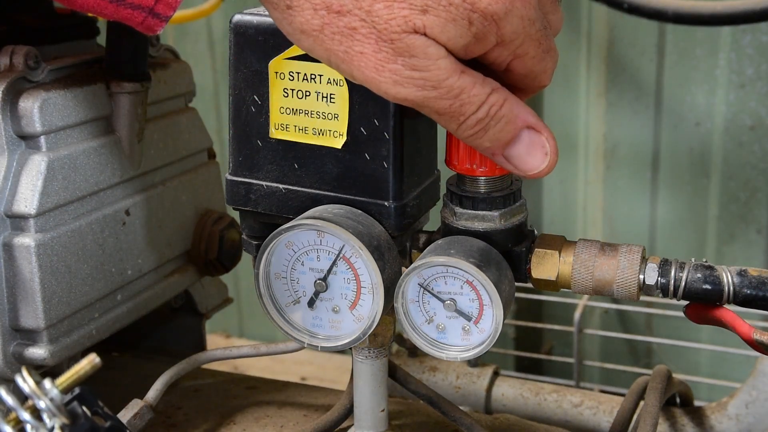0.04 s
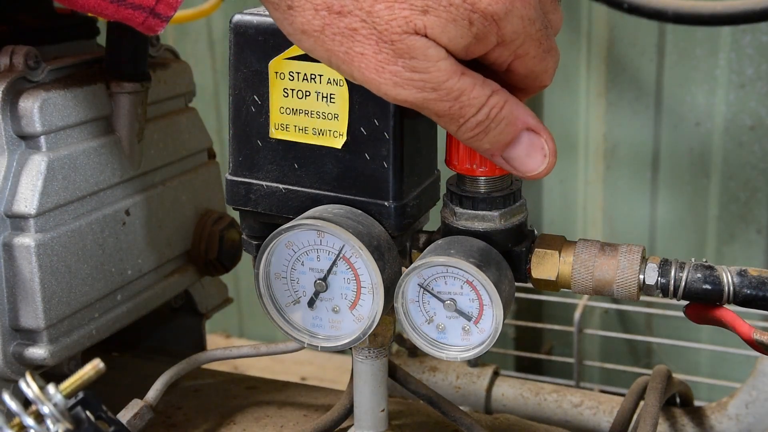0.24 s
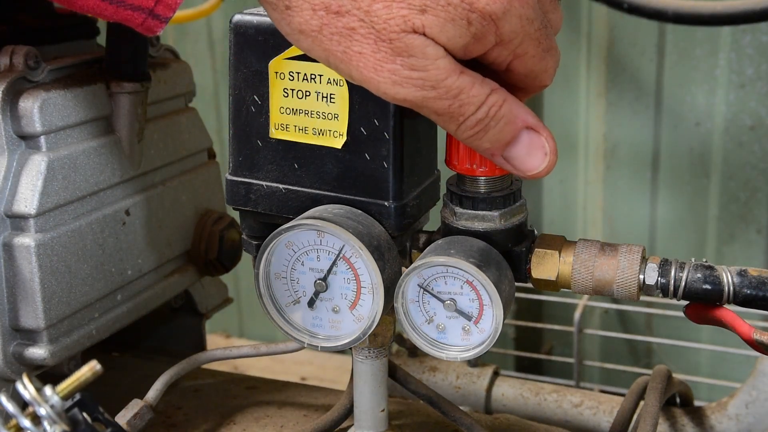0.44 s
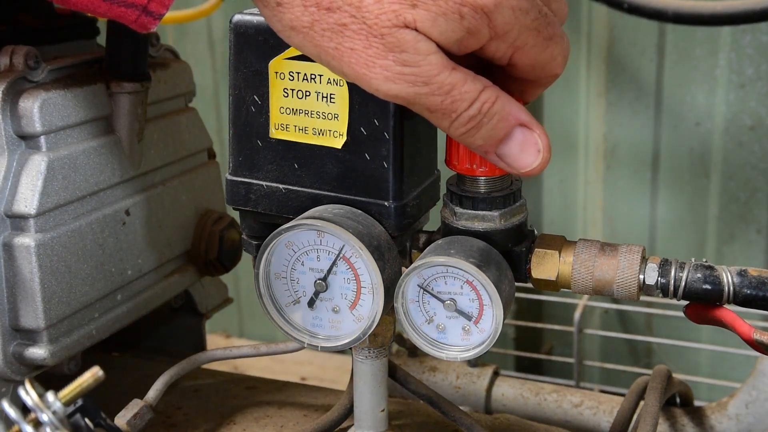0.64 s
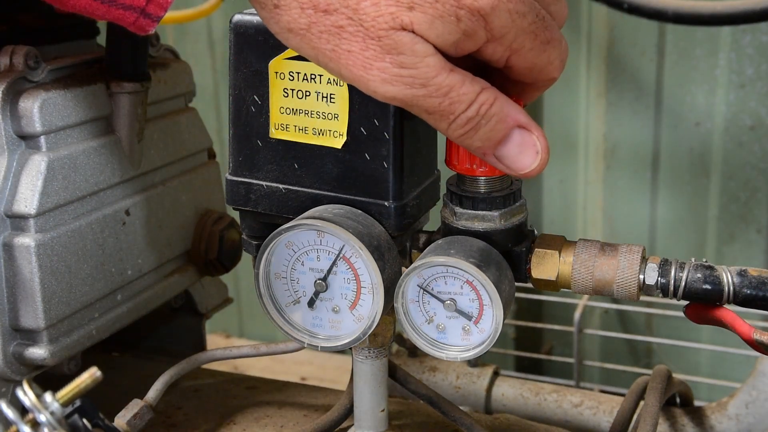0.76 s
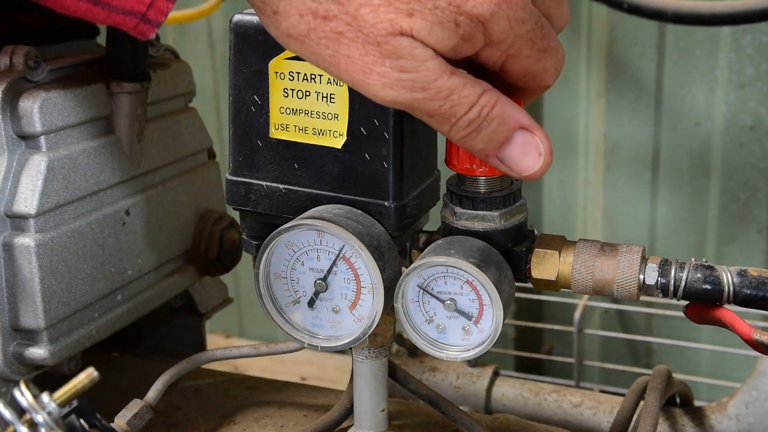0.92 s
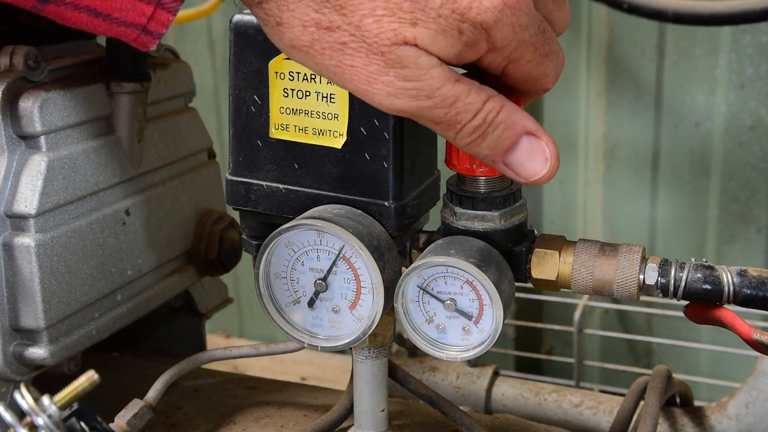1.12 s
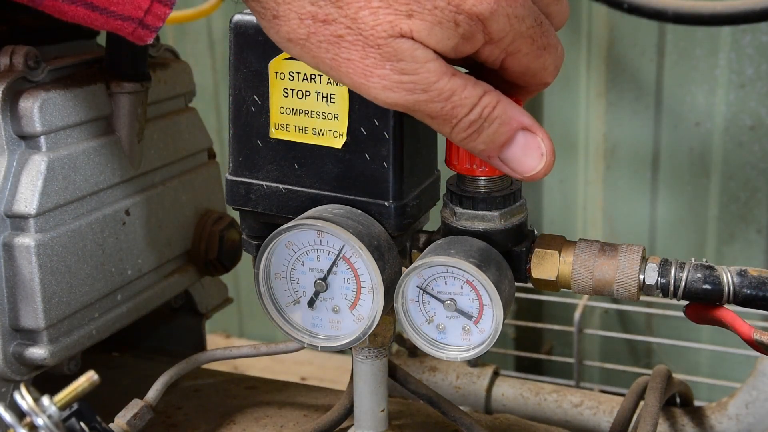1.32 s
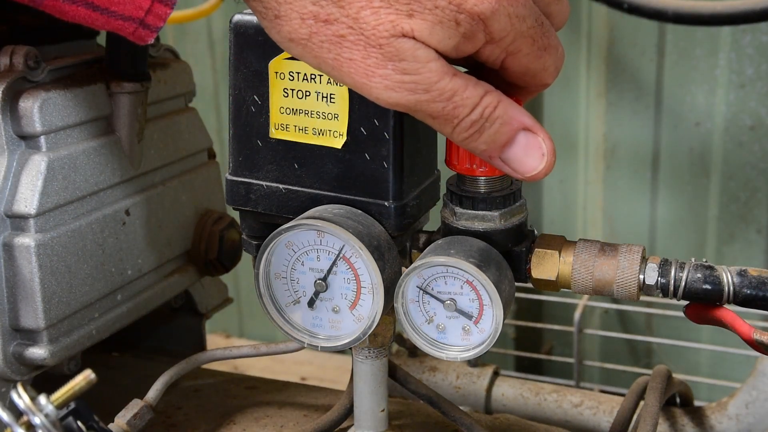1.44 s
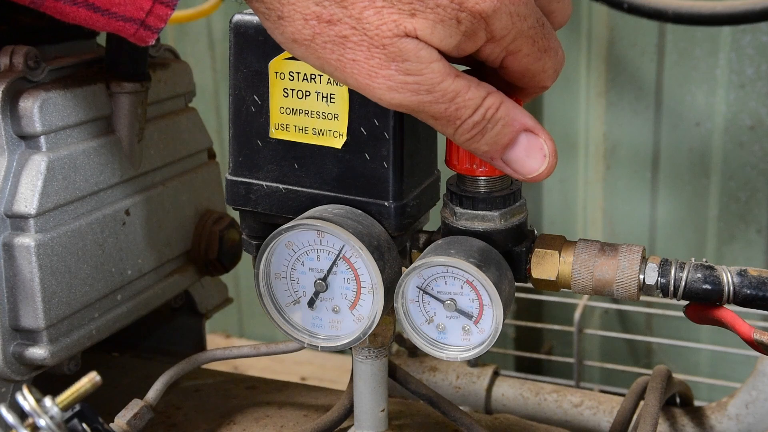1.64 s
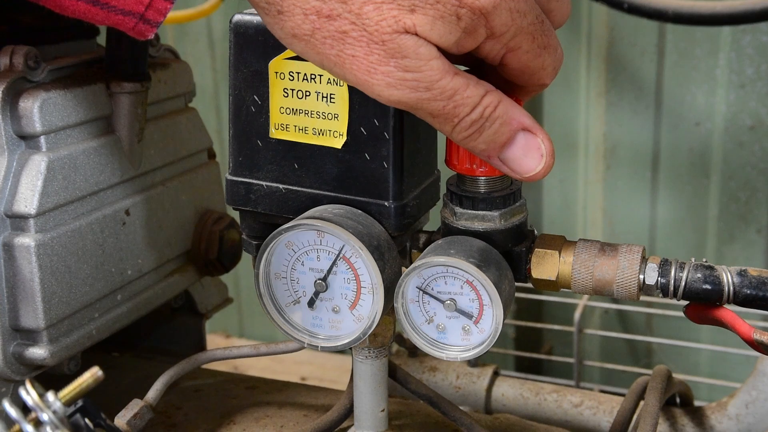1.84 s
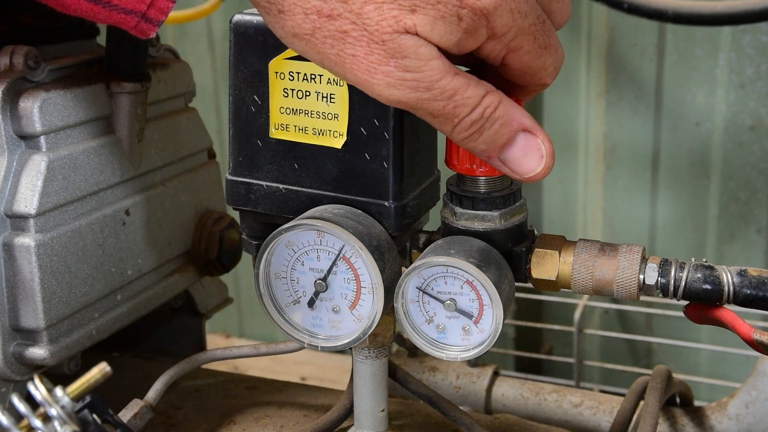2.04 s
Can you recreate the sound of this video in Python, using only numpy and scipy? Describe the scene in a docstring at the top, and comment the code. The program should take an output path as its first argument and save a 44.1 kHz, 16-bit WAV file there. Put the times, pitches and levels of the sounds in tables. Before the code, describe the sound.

Steady bright hiss of escaping compressed air, faint low rumble beneath, slight hand handling near the end

```python
"""Compressed air bleeding through a valve

Air hisses steadily through a regulator valve and hose in a workshop: patchy noise for the jet, with more
noise shaped by the resonances of the valve throat, the hose and the small outlet cavities.
Underneath, a lumpy low rumble made of filtered noise comes and goes. A hand knocks the knob once
(a few decaying sines) and rubs it (short strokes of grainy noise)."""
import sys
import numpy as np
from scipy import signal
from scipy.fft import rfft, irfft, next_fast_len
from scipy.io import wavfile
from scipy.ndimage import uniform_filter1d, map_coordinates

SR = 44100
rng = np.random.default_rng(int(sys.argv[2]) if len(sys.argv) > 2 else 0)


def log_audio(samples):
    """Write samples as a 16-bit WAV file to the path given in sys.argv[1]."""
    # one column per channel
    frames = np.atleast_2d(samples).T
    # limit to full scale, then quantise
    limited = np.clip(frames, -1, 1)
    pcm = np.round(limited * 32767).astype(np.int16)
    wavfile.write(sys.argv[1], SR, pcm)


N = 91595  # length in samples, about 2.08 s


def amp(db):
    """Turn dB into gain."""
    return 10 ** (np.asarray(db) / 20)


def unit(x):
    """Scale to rms 1."""
    return x / np.sqrt(np.mean(x ** 2) + 1e-20)


def along(points, hz):
    """Read an EQ curve of (f, level) points, straight in dB over log frequency."""
    f, level = np.transpose(points)
    return np.interp(np.log(hz + 1), np.log(f + 1), level)


def curve(rows):
    """Draw an automation line through (t, level) rows, one value per sample."""
    t, level = np.transpose(rows)
    return np.interp(np.arange(N) / SR, t, level)


def wobble(rate):
    """Smooth random curve through `rate` random knots a second."""
    knots = rng.standard_normal(int(N * rate / SR) + 4)
    return map_coordinates(knots, [np.arange(N) * rate / SR])


def filtered(x, response):
    """Multiply the spectrum of x by a function of frequency in Hz."""
    size = next_fast_len(N + SR // 2)  # spare room so tails do not wrap round
    spectrum = rfft(x, size) * response(np.fft.rfftfreq(size, 1 / SR))
    return irfft(spectrum, size)[..., :N]


def turbulence(patchy_db):
    """Turbulent noise of unit power per Hz, its gain varying in random time-frequency patches."""
    cells = signal.stft(rng.standard_normal(N + 512), nperseg=256)[2]
    field = rng.standard_normal(cells.shape)
    field = uniform_filter1d(field, size=4, axis=0)  # blur across frequency
    field = uniform_filter1d(field, size=6, axis=1)  # blur across time
    noise = signal.istft(cells * amp(patchy_db * unit(field)), nperseg=256)[1][:N]
    return unit(noise) * np.sqrt(SR / 2)


def ringing(modes, patchy_db):
    """Turbulence coloured by air resonances whose powers add."""
    def response(f):
        power = 0
        for hz, width, db in modes:
            power = power + amp(2 * db) / (1 + (2 * (f - hz) / width) ** 2) ** 2
        return np.sqrt(power)
    return filtered(turbulence(patchy_db), response)


# rise and fall of the rumble before the bass cut: t/s, level/dB
RUMBLE_LEVEL = [(0, -55), (.17, -47), (.35, -53), (.5, -45), (.8, -50), (.95, -68), (1.6, -59), (1.85, -49),
                (2.08, -56)]
# EQ of the rumble, before levelling: f/Hz, level/dB
RUMBLE_EQ = [(20, -30), (40, -1), (60, 4.5), (90, -3.5), (160, -25), (300, -66)]


def rumble():
    """Low-passed noise, narrow enough in band to sound lumpy, riding a level curve."""
    noise = filtered(rng.standard_normal(N), lambda f: amp(along(RUMBLE_EQ, f)))
    return amp(curve(RUMBLE_LEVEL)) * unit(noise)


# modes of the struck knob, relative to the knock level: f/Hz, level/dB, 60 dB decay time/s
KNOB_MODES = [(380, -3, .02), (580, -2, .015), (850, -2, .01), (1100, -5, .01), (1370, -5, .03)]
KNOCK_S, KNOCK_DB, KNOCK_THIN_HZ = 1.7117, -27, 120  # start, level, low-cut corner


def knock():
    """One dull knock: the knob's modes start together and die away exponentially."""
    since = np.maximum(np.arange(N) / SR - KNOCK_S, 0)
    body = np.zeros(N)
    for hz, db, t60 in KNOB_MODES:
        body -= amp(db - 60 * since / t60) * np.sin(2 * np.pi * hz * since)
    return filtered(amp(KNOCK_DB) * body, lambda f: 1j * f / (KNOCK_THIN_HZ + 1j * f))


# strokes of the hand: start t/s, length/s, peak level/dB of the stroke's envelope
RUB_STROKES = [(.2, .22, -47), (1.74, .1, -48), (1.84, .14, -42)]
# EQ of the rubbing, before levelling: f/Hz, level/dB
RUB_EQ = [(100, -22), (200, -4.5), (320, 5), (600, -5), (1400, -2.5), (2000, -14), (3500, -31)]


def rubbing():
    """Skin on the knob: noise with a fast random gain for grain, under rounded strokes."""
    t = np.arange(N) / SR
    stroke = np.zeros(N)
    for start, length, db in RUB_STROKES:
        progress = np.clip((t - start) / length, 0, 1)
        stroke += amp(db) * np.sin(np.pi * progress) ** .6
    grain = rng.standard_normal(N) * amp(3.2 * wobble(110))
    return stroke * unit(filtered(grain, lambda f: amp(along(RUB_EQ, f))))


# broad spectrum of the jet, before the flow gain: f/Hz, level/dB per Hz
JET_EQ = [(30, -79), (100, -76.5), (600, -77.5), (1300.0, -81), (2600.0, -75.5), (3700.0, -80),
          (5200.0, -79.5), (6500.0, -71), (8500.0, -72), (9500.0, -67.5), (11000.0, -70), (13000.0, -56),
          (15700.0, -62)]


def jet():
    """Broad turbulence of the escaping air."""
    return filtered(turbulence(patchy_db=1.38), lambda f: amp(along(JET_EQ, f)))


# air column of the hose, before flicker and flow: f/Hz, -6 dB width/Hz, peak level/dB per Hz
HOSE_MODES = [(315, 130, -77.5), (541, 130, -77.5), (935, 130, -72), (1370, 160, -80), (1860, 100, -75.5),
              (2070, 80, -74), (2910, 360, -73), (3310, 150, -72.5), (4250, 100, -74), (4890, 120, -78.5),
              (5770, 160, -77.5)]


def hose():
    """Turbulence through the hose's air column, flickering slowly."""
    return amp(1.6 * wobble(9)) * ringing(HOSE_MODES, patchy_db=1.2)


# valve throat, odd modes of a short tube, before flicker and flow:
# f/Hz, -6 dB width/Hz, peak level/dB per Hz
THROAT_MODES = [(2200, 70, -68), (2385, 140, -59.5), (2500, 80, -64), (2600, 80, -65), (6750, 100, -68),
                (6980, 160, -61.5), (7175, 240, -58), (7180, 70, -58), (7490, 280, -66)]


def throat():
    """Turbulence through the throat's short tube, flickering fast."""
    return amp(-0.12 + .7 * wobble(45)) * ringing(THROAT_MODES, patchy_db=0.54)


# small outlet cavities, before flicker and flow: f/Hz, -6 dB width/Hz, peak level/dB per Hz
OUTLET_MODES = [(9700, 460, -61.5), (10170, 240, -56), (10540, 290, -56.5), (11370, 750, -52.5),
                (11520, 360, -52.5), (11970, 750, -53), (12280, 140, -49.5), (12740, 200, -53.5),
                (13010, 270, -52.5), (13180, 100, -49), (13310, 130, -52), (13540, 90, -53.5),
                (14240, 200, -52), (14450, 210, -50.5), (14665, 50, -50), (14710, 240, -47),
                (15080, 290, -52.5), (15700, 120, -59)]


def outlet():
    """Turbulence through the outlet's small cavities, a bright band with a slight fast flicker."""
    return amp(-0.12 + .3 * wobble(50.2)) * ringing(OUTLET_MODES, patchy_db=1.47)


# slow drift of the flow, applied to all the air: t/s, level/dB
FLOW_LEVEL = [(0, 0.6), (.5, -0.5), (1.1, 0.27), (1.6, 0.5), (2.08, 0.3)]


def air():
    """The jet and the cavities it excites swell together with the flow."""
    flow_db = curve(FLOW_LEVEL) + .25 * wobble(9.19) + .3 * wobble(70.03)
    return amp(flow_db) * (jet() + hose() + throat() + outlet())


def scene():
    """Mix all sources to one channel."""
    return (rumble() + knock() + rubbing() + air())[None]


BASS_CUT_HZ, TOP_HZ, EDGE_HZ = 45, 15740, 12  # low-cut corner, band limit, fall by 1/e above it


def record(dry):
    """The microphone thins the deepest bass; the treble stops steeply at the band limit."""
    def response(f):
        bass_cut = (1j * f / (BASS_CUT_HZ + 1j * f)) ** 2
        return bass_cut * np.exp(-np.maximum(f - TOP_HZ, 0) / EDGE_HZ)
    return filtered(dry, response)


dry = scene()
out = record(dry)
log_audio(out)
```